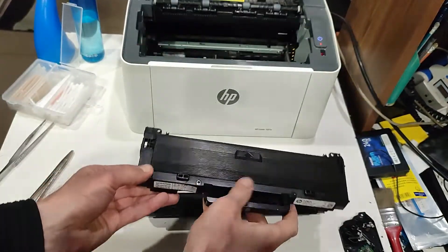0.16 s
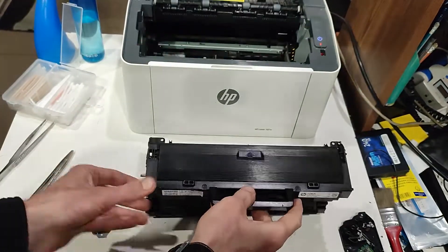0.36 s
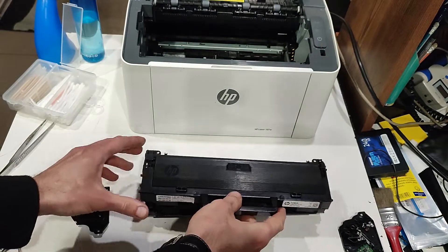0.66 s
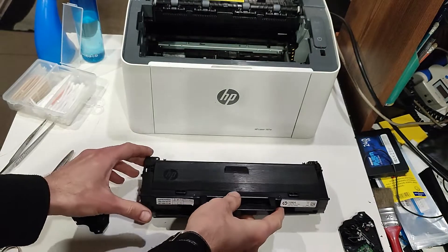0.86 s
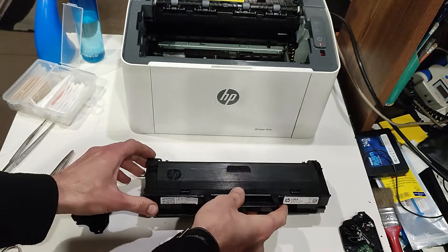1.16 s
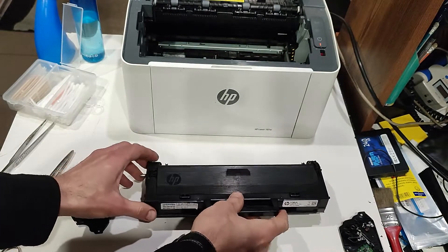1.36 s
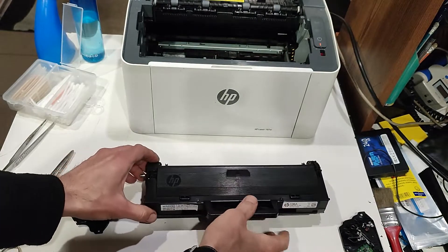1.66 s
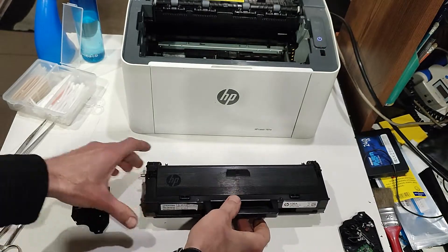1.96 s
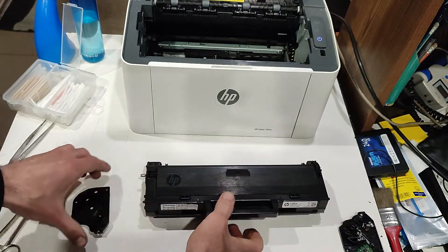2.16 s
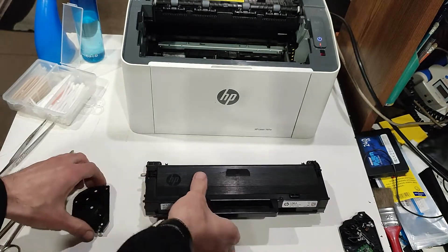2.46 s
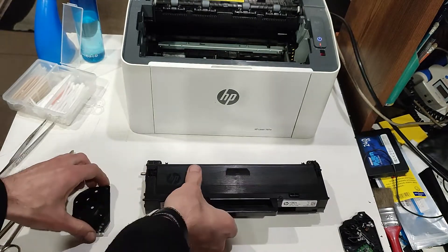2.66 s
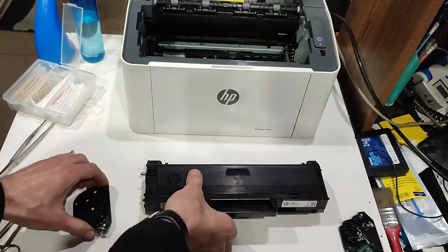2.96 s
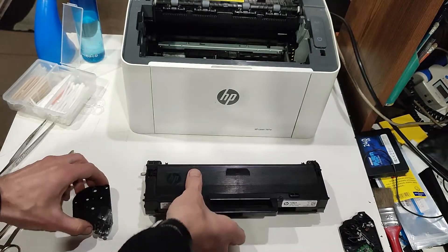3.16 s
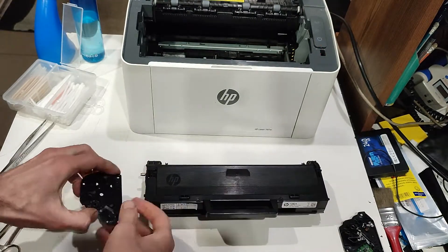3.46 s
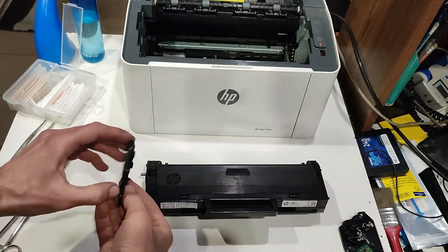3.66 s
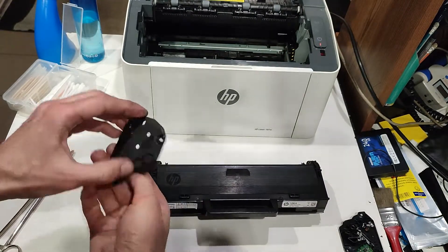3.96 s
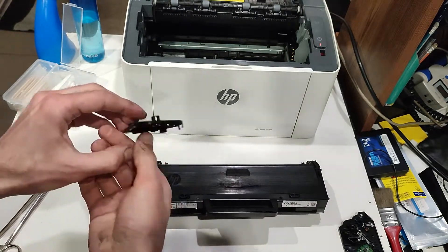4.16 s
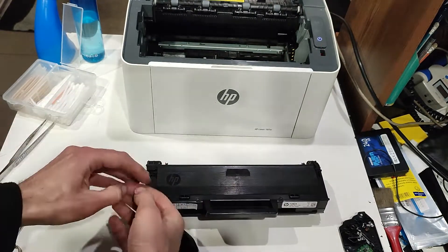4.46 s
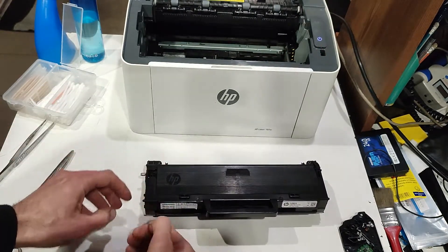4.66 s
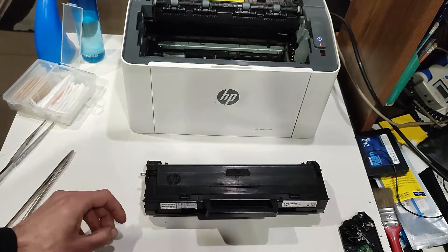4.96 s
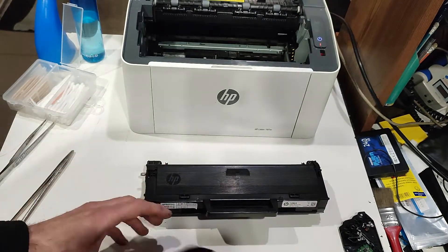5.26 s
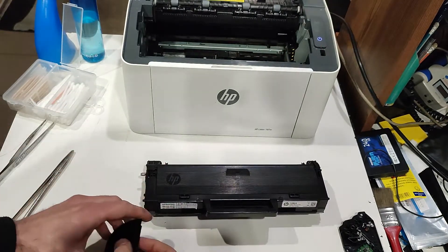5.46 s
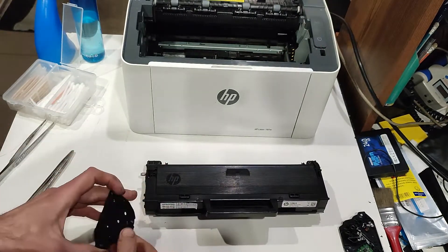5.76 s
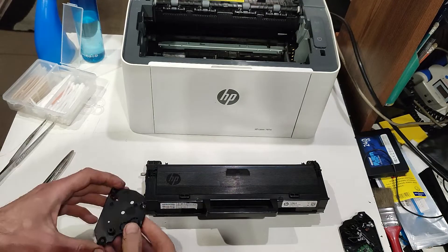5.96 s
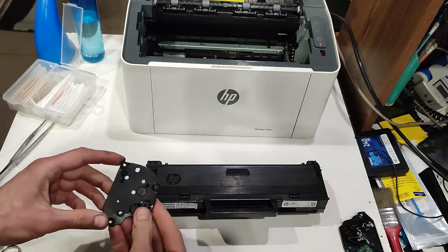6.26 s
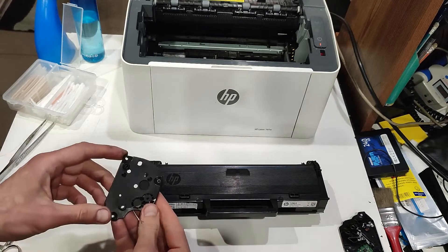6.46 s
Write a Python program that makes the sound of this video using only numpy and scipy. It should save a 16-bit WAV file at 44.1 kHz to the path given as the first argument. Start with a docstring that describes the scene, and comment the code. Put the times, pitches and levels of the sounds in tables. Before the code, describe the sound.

Close, hollow knocks come from a plastic printer cartridge settling on a desk, with hands brushing softly around it. After some light ticks and pats, a small hard plastic cap snaps out of the fingers and clatters on the desktop, ending in a brief rattle and a last click. Quiet electrical hum and a distant fan fill the small room throughout.

```python
"""Mains hum, a far fan and a deep rumble fill a small room; hands rub plastic and brush a desk.
A plastic toner cartridge is set down and knocks as it settles (0.3-1.4 s): edge first, then face.
Its loose end cap is picked up (2.4 s), patted by fingertips, and slips from them with a snap (4.4 s).
The cap hits the desk, bounces, rattles to rest (4.7 s) and tips over with one more click (5.2 s).
Two faint finger rubs follow."""
import sys
import numpy as np
from scipy import signal
from scipy.fft import rfft, irfft
from scipy.io import wavfile

SR = 44100
rng = np.random.default_rng(int(sys.argv[2]) if len(sys.argv) > 2 else 0)


def wrap_up_sound(samples):
    """Save the sound to the file named by the first command line argument, as 16-bit audio."""
    columns = np.atleast_2d(samples).T
    # keep every value between -1 and 1, then stretch to whole-number steps
    tamed = np.clip(columns, -1, 1)
    steps = np.round(tamed * 32767).astype(np.int16)
    wavfile.write(sys.argv[1], SR, steps)


N = 291060


def from_db(db):
    """Decibels to gain."""
    return 10 ** (np.asarray(db) / 20)


def unit(x):
    """Scale to unit energy."""
    return x / np.sqrt(np.sum(x ** 2) + 1e-20)


def at_hz(points, hz):
    """Interpolate a table over log frequency."""
    f, value = np.transpose(points)
    return np.interp(np.log(np.maximum(hz, 1)), np.log(f), value)


def bins_hz(size):
    """Frequencies of the rfft bins."""
    return np.arange(size // 2 + 1) * SR / size


def band(x, low_hz, high_hz, order):
    """Causal band-pass."""
    return signal.sosfilt(signal.butter(order, [low_hz, high_hz], "band", fs=SR, output="sos"), x)


def noise(colour, low_hz):
    """Steady coloured noise, rolled off below low_hz; rms 1."""
    hz = bins_hz(N)
    gain = from_db(at_hz(colour, hz)) * hz ** 2 / (hz ** 2 + low_hz ** 2)
    return unit(irfft(rfft(rng.standard_normal(N)) * gain, N)) * np.sqrt(N)


# still-air spectrum: f/Hz, relative level/dB
AIR_COLOUR = [(70, -10), (120, -11), (185, -14.5), (232, -13), (285, -18), (400, -18.5), (520, -20),
              (720, -20.5), (1200, -28.5), (2300, -37), (5000, -41), (9500, -39), (12000, -44),
              (14000, -58.5)]
# mains and fan tones: f/Hz, level/dB
HUM_TONES = [(50, -64.5), (232, -76.5), (720, -86)]
def background(air_db=-70.5, rumble_db=-54, waver_rad=0.58):
    """Room air, a very deep rumble and slightly wavering mains and fan tones."""
    t = np.arange(N) / SR
    rumble_colour = [(5, 1), (11, -9), (20, -9), (35, -21), (70, -34.5), (200, -69), (1000, -110)]
    rumble = noise(rumble_colour, low_hz=5)
    hum = 0
    for hz, db in HUM_TONES:
        slow_bins = rfft(rng.standard_normal(N))[:N // 12000]   # below 3.6 Hz
        wander = unit(irfft(slow_bins, N)) * np.sqrt(N)
        hum = hum + from_db(db) * np.sqrt(2) * np.sin(2 * np.pi * hz * t + waver_rad * wander)
    return from_db(air_db) * noise(AIR_COLOUR, low_hz=35) + from_db(rumble_db) * rumble + hum


def sliding(strokes, colour, low_hz, grain_db):
    """Skin or cloth drags in tiny uneven slips; each stroke has a bell-shaped envelope."""
    t = np.arange(N) / SR
    envelope = sum(from_db(db) * np.exp(-2 * ((t - s) / length_s) ** 2) for s, length_s, db in strokes)
    slips = unit(band(rng.standard_normal(N), 15, 250, order=1)) * np.sqrt(N)
    return envelope * from_db(grain_db * slips) * noise(colour, low_hz)


# strokes on plastic (rubs) and desk (brushes): centre t/s, length/s, level/dB
RUBS = [(0.28, 0.74, -83), (1.402, 0.03, -67), (1.68, 0.03, -75.5), (2.08, 0.17, -81), (3.67, 0.15, -78),
        (4.05, 0.16, -76.5), (4.3, 0.15, -82.5), (5.68, 0.076, -80.5), (5.9, 0.12, -84.5)]
BRUSHES = [(0.52, 1, -76), (2.04, 0.24, -75.5), (3.4, 0.3, -77.5), (4.34, 0.1, -72)]
# friction spectra: f/Hz, relative level/dB
RUB_COLOUR = [(2000, -2), (5500, -11), (7500, -5.5), (9500, 1), (11500, -8), (14000, -5)]
BRUSH_COLOUR = [(300, 4.5), (700, 8.5), (1800, -2), (3500, -2), (5500, -11), (14000, -19)]
def hands():
    """Fingertips hiss on the plastic; palms and sleeves brush more dully on the desk."""
    rubs = sliding(RUBS, RUB_COLOUR, low_hz=900, grain_db=3)
    brushes = sliding(BRUSHES, BRUSH_COLOUR, low_hz=251.7, grain_db=2.36)
    return rubs + brushes


def dying_noise(t, colour, t60s, swell=1):
    """Coloured noise, each octave decaying at its own rate; t60s: f/Hz, T60/s."""
    hz = bins_hz(len(t))
    octave = np.log2(np.maximum(hz, 1))
    white = rfft(rng.standard_normal(len(t)))
    out = 0
    for centre in np.arange(6, 15):   # 64 Hz to 16 kHz
        part = irfft(white * np.maximum(1 - np.abs(octave - centre), 0), len(t))
        decay = np.exp(-np.log(1000) * t / at_hz(t60s, 2. ** centre))
        out = out + part * unit(swell * decay)
    fade = np.minimum(2 - 2 * t / t[-1], 1)
    return irfft(rfft(out) * from_db(at_hz(colour, hz)), len(t)) * fade


# reverberation spectrum: f/Hz, relative level/dB
ROOM_COLOUR = [(150, -1), (600, -3), (2500, 0.5), (7000, -1), (14000, -5.5)]
# reverberation time: f/Hz, T60/s
ROOM_T60 = [(150, 0.34), (600, 0.15), (2500, 0.23), (7000, 0.12), (14000, 0.29)]
def room(x, build_s=0.0023, wet_db=-2):
    """Reflections from desk clutter and walls build within milliseconds, different for every spot."""
    t = np.arange(len(x)) / SR
    tail = dying_noise(t, ROOM_COLOUR, ROOM_T60, swell=1 - np.exp(-(t / build_s) ** 2))
    return x + from_db(wet_db) * signal.fftconvolve(x, tail)[:len(x)]


def emphasise(x, hz, boost_db=7, q=5):
    """Lift one resonance above the rest."""
    return x + (from_db(boost_db) - 1) * signal.lfilter(*signal.iirpeak(hz, q, fs=SR), x)


# bounds of the registers thump, knock, clack, snap, tick: f/Hz
REGISTER_EDGES_HZ = [100, 350, 1450, 3700, 7200, 16000]
def contact(levels_db, main_hz, damping, modes, colour, crack_t60s, ring_db, spread_db, rise_s=0.00045):
    """One touch: a crack of crowded modes plus ringing resonances, levelled per register."""
    t = np.arange(SR // 3) / SR
    hz, width_hz, db = np.transpose(modes)[:, :, None]
    # mode strengths and signs depend on the point struck
    strength = from_db(db + spread_db * rng.standard_normal(db.shape)) * width_hz
    sign = rng.choice([-1, 1], db.shape)
    decay = np.exp(-np.pi * width_hz * damping * t)
    ring = np.sum(sign * strength * np.sin(2 * np.pi * hz * t) * decay, axis=0)
    crack = dying_noise(t, colour, crack_t60s)
    body = unit(crack) + from_db(ring_db) * unit(ring)
    onset = 1 - np.exp(-t / rise_s)   # bending waves spread over the part
    heard = room(emphasise(body * onset, main_hz))
    registers = zip(levels_db, REGISTER_EDGES_HZ, REGISTER_EDGES_HZ[1:])
    touch = sum(from_db(level) * unit(band(heard, low, high, order=4)) for level, low, high in registers)
    return np.sqrt(0.008 * SR) * touch   # level = energy spread over 8 ms


def struck(touches, damping, **part):
    """Sum a part's touches; damping scales the mode widths, overall or per touch."""
    out = np.zeros(N + SR)
    for (s, *levels_db, main_hz), factor in zip(touches, np.broadcast_to(damping, len(touches))):
        touch = contact(levels_db, main_hz, factor, **part)
        start = round(s * SR)
        out[start:start + len(touch)] += touch
    return out[:N]


def blows(hits, registers, seat_s, pivot_hz=750):
    """Two touches per blow: edge lands, face seats. Hardness and the spot struck tilt the registers."""
    edge_db, seat_db, hardness_share, octave_db = np.transpose(registers)
    touches = []
    for s, db, hardness_db, main_hz in hits:
        levels_db = db + hardness_share * hardness_db + octave_db * np.log2(main_hz / pivot_hz)
        touches.append((s, *(levels_db + edge_db), main_hz))
        touches.append((s + seat_s, *(levels_db + seat_db), main_hz))
    return touches


# blows on the desk: t/s, relative level/dB, hardness (treble over knock)/dB, main resonance f/Hz
CARTRIDGE_HITS = [(0.284, -66, -18, 990), (0.889, -50.5, -38, 850), (1.011, -48, -20.5, 570),
                  (1.073, -60.5, -43, 555), (1.148, -52.5, -19, 365), (1.176, -41.5, -23, 530),
                  (1.216, -55, -41, 845), (1.228, -56, -48, 266), (1.266, -44, -2.5, 565),
                  (1.2745, -50, -23, 1070), (1.402, -48, -6, 490), (1.409, -39, -22, 440),
                  (1.415, -48, -3, 584), (1.4228, -32, -10.5, 800)]
# thump to tick: edge level/dB, seat level/dB, hardness share, tilt/(dB per octave of main resonance)
CARTRIDGE_REGISTERS = [(-5.5, -10.5, -0.03, -6.5), (4, -11.5, -0.018, 7), (-2, -12.5, 0.5, 7),
                       (-3.5, -24, 1.09, 11), (-4, -11, 0.94, 24)]
# shell resonances: f/Hz, base width/Hz, relative level/dB
CARTRIDGE_MODES = [(253, 25, 2.5), (385, 25, 3.5), (560, 360, 4), (685, 85, -27), (920, 84, 4),
                   (1080, 66, -37), (1224, 69, -12), (1696, 220, -9), (2100, 220, -7.5), (2730, 95, -9.5),
                   (3190, 180, -9), (4170, 90, -10), (5070, 70, -9), (8200, 73, -3), (8930, 200, -2.5)]
# weak, crowded modes: f/Hz, relative level/dB
CARTRIDGE_COLOUR = [(90, 5), (170, -9.5), (255, 4), (330, -4.5), (540, -1), (780, -3.5), (1100, -6.5),
                    (1500, -16.5), (2200, -15), (3400, -18), (5200, -11), (8500, -20), (14000, -37)]
def cartridge(gain_db=-2):
    """The long hollow shell knocks on the desk, damped by the hand that holds it."""
    touches = blows(CARTRIDGE_HITS, CARTRIDGE_REGISTERS, seat_s=0.002)
    knocks = struck(touches, damping=0.35, modes=CARTRIDGE_MODES, colour=CARTRIDGE_COLOUR,
                    crack_t60s=[(200, 0.079), (1000, 0.024), (8000, 0.03)], ring_db=-4, spread_db=5.5)
    return from_db(gain_db) * knocks


# handling, drop and tip-over: t/s, relative level/dB, hardness/dB, main resonance f/Hz
CAP_HITS = [(2.446, -67, -12.5, 388), (2.607, -50, -13, 460), (2.704, -63.5, -15, 454),
            (2.733, -67, -40, 433), (2.799, -72.5, -40, 633), (2.85, -58, -3, 606), (2.974, -73, -41, 567),
            (3.0275, -48, -10, 1720), (3.083, -59, -20, 1540), (4.079, -80.5, 13.5, 774),
            (4.312, -75, 3, 880), (4.3826, -27, -2, 850), (4.3885, -22.5, -6, 980),
            (4.3963, -25.5, -10, 930), (4.4008, -27.5, 2.5, 990), (4.4836, -49, 3.5, 600),
            (4.497, -21.5, -20.5, 720), (4.5787, -27, -12, 690), (4.6043, -27.5, -0.5, 1500),
            (4.614, -35.5, 2, 1240), (4.6662, -34.5, -6, 644), (4.6785, -30, -3.5, 660),
            (4.689, -39, -4, 654), (4.7126, -35.5, -1, 695), (5.029, -60, -23, 402), (5.044, -64, -19, 698),
            (5.059, -54.5, -20.5, 558), (5.1677, -34.5, -3, 343)]
# thump to tick: edge level/dB, seat level/dB, hardness share, tilt/(dB per octave of main resonance)
CAP_REGISTERS = [(-16, -15.5, -0.05, -6), (-3.5, -3.5, -0.11, -2), (-5.5, -7.5, 0.079, 2),
                 (-2.5, -15.5, 0.85, 2), (-2.5, -15, 1.1, -2.5)]
# plate resonances: f/Hz, base width/Hz, relative level/dB
CAP_MODES = [(246, 25, -5), (403, 19, -7), (616, 13, -1), (697, 17, 5), (884.8, 14, 0.5), (1006, 40, -6),
             (1083, 20, -2.5), (1266, 8.7, -0.5), (1446, 30, -10), (2049, 23, -7), (2160, 28, -8.5),
             (2555, 18, -6.5), (3077, 16, -5.5), (3368, 27, -8), (4088, 13, -14), (4160, 38, -9),
             (4500, 35, -19), (5120, 29, -17.5), (5280, 99, -17.5), (5920, 110, -20), (8050, 100, -14),
             (8690, 200, -18), (9440, 130, -22)]
# weak, crowded modes: f/Hz, relative level/dB
CAP_COLOUR = [(110, -10), (190, -19), (250, -12.5), (300, -18.5), (440, 4.5), (570, -16.5), (700, -2),
              (1100, -6.5), (1700, -10.5), (4100, -13), (4900, -20), (9000, -18), (12000, -22),
              (14000, -28)]
# damping by the fingers, later by the desk: t/s, width factor
CAP_DAMPING = [(4.3, 3.2), (4.4, 1.86), (4.72, 1.1), (4.82, 1.9), (5.2, 2.47)]
def end_cap(gain_db=0.3, pat_damping=5.6):
    """The small stiff plate rings freely once out of the fingers; pats barely ring."""
    hard = np.array(blows([*CAP_HITS, *rattle()], CAP_REGISTERS, seat_s=0.0042))
    soft = pats()
    hard_damping = np.interp(hard[:, 0], *np.transpose(CAP_DAMPING))
    damping = np.r_[hard_damping, np.full(len(soft), pat_damping)]
    clicks = struck([*hard, *soft], damping, modes=CAP_MODES, colour=CAP_COLOUR,
                    crack_t60s=[(200, 0.068), (1000, 0.027), (8000, 0.0084)], ring_db=-2, spread_db=2.5)
    return from_db(gain_db) * clicks


# fingertip landings: t/s, relative level/dB
PATS = [(3.304, -55.5), (3.438, -57), (3.49, -69), (3.566, -60.5), (4.019, -62)]
def pats(main_hz=310, registers_db=(1, -21, -35, -27, -30)):
    """Soft fingertips on the held cap: single touches, mostly thump."""
    return [(s, *np.add(db, registers_db), main_hz) for s, db in PATS]


def rattle(count=7, start_s=4.731, gap_s=0.011, jitter_s=0.001032, hardness_db=-18, main_hz=880):
    """The cap rocks on its rim in near-even blows that hold their level briefly, then die away."""
    first_db, loss_per_blow_db, hold_blows = -37, 3, 1.4
    k = np.arange(count)
    times_s = start_s + gap_s * k + jitter_s * rng.standard_normal(count)
    levels_db = first_db - loss_per_blow_db * np.maximum(k - hold_blows, 0)
    return [(s, db, hardness_db, main_hz) for s, db in zip(times_s, levels_db)]


def scene():
    """Mono sum of both parts, hands and background."""
    return (cartridge() + end_cap() + hands() + background())[None, :]


def record(dry, cutoff_hz=14400):
    """Steep elliptic low-pass."""
    return signal.sosfilt(signal.ellip(10, 0.2, 70, cutoff_hz, fs=SR, output="sos"), dry)


dry = scene()
out = record(dry)
wrap_up_sound(out)
```